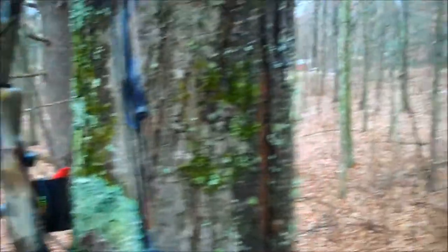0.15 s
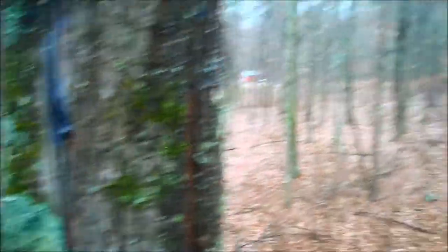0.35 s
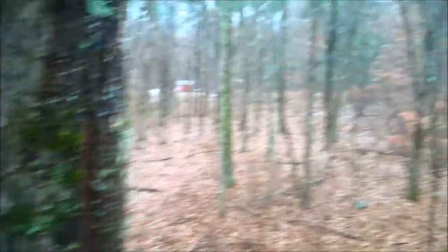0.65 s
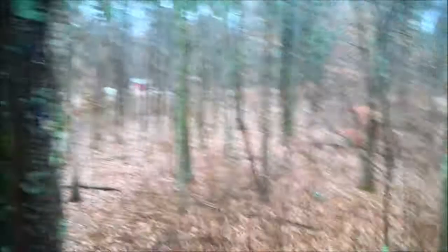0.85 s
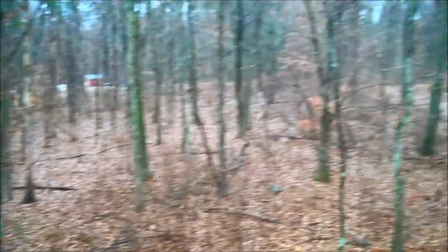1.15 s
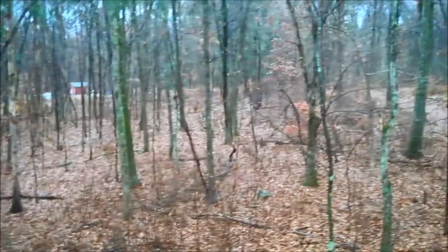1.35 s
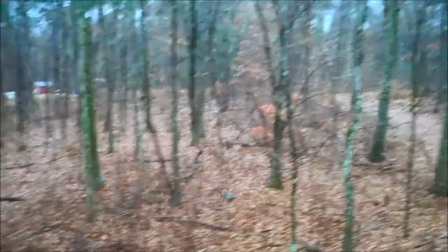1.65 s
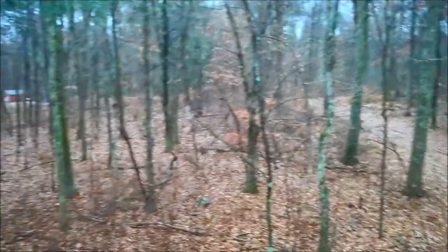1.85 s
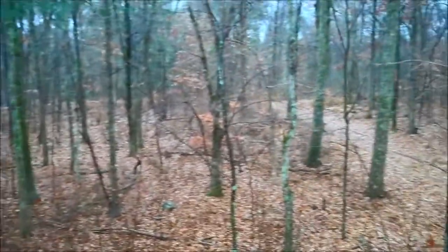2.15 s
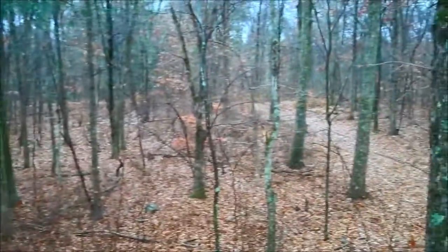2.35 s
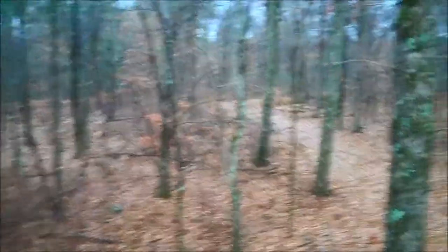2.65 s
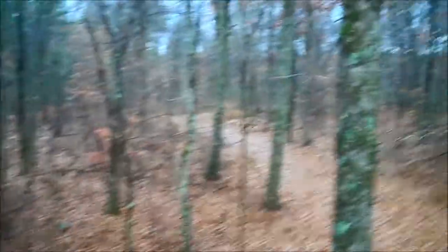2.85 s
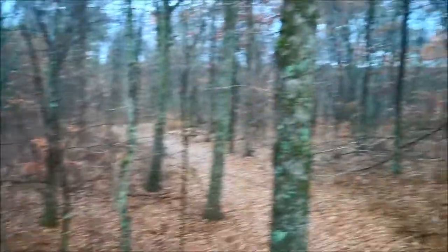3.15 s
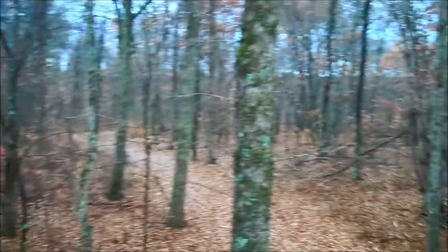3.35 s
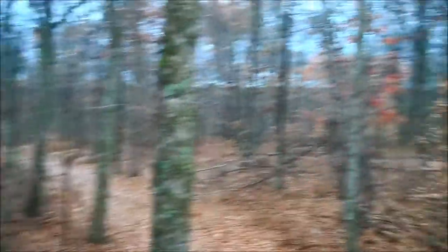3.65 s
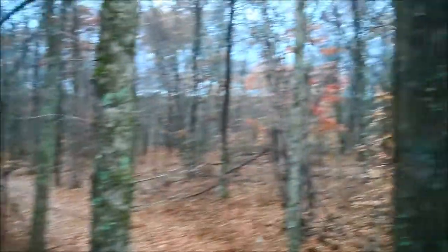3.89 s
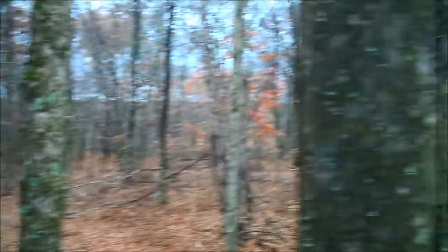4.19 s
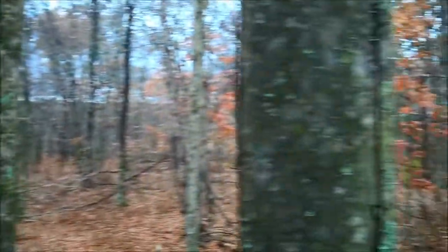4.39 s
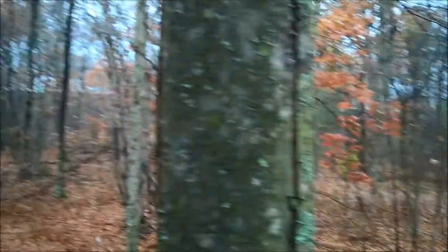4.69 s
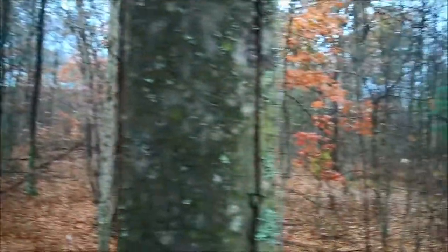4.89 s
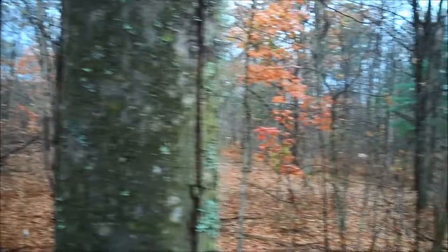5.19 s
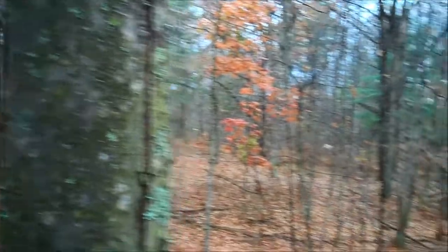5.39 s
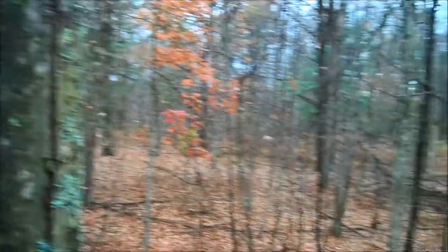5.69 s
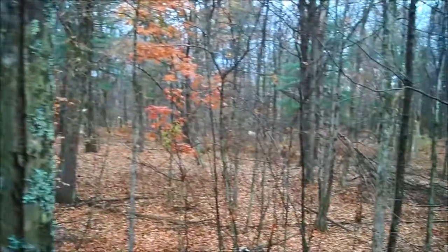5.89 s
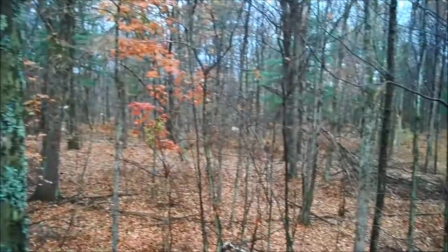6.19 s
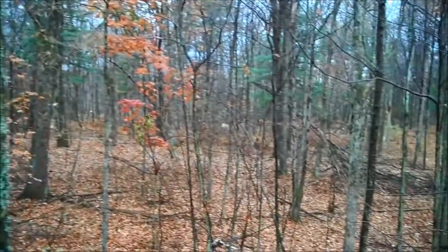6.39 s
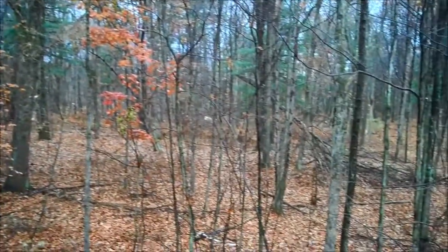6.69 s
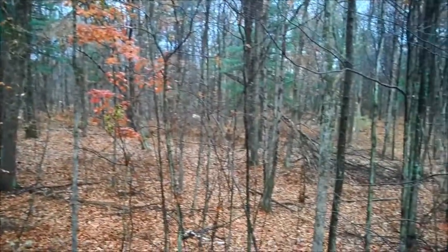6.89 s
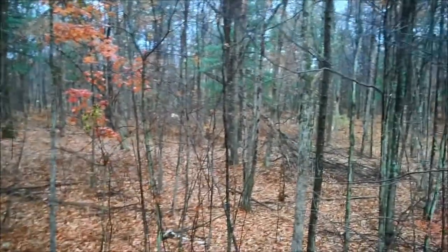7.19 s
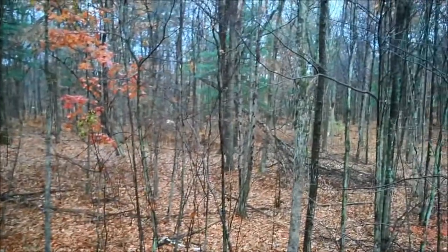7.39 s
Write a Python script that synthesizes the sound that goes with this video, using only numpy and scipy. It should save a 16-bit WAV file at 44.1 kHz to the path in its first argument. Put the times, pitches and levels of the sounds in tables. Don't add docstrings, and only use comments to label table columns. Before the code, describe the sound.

Steady light rain in a leafless wood, heard in stereo from a hand-held microphone. Throughout, countless distant drops merge into a soft broad hiss, with fine, dense patter on leaf litter. The hiss swells gently around 1 and 2 seconds, slightly at 3.3, and briefly at 7.15. Close drops stand out irregularly: crisp leaf clicks and a small spray around 0.65-1.2, faint low wind puffs from 1.3 to 1.9, mostly right, then a dull tap at 1.8. From 2.6 onward ticks thicken, with a sharp bark tick at 3.0 and leaf ticks and splashes around 3.6-4.6. At 4.83 a fat drop lands with a short, blunt pop beside the microphone; the brightest leaf snap follows at 5.03. More woody ticks, soft thuds and little sprays cluster near 5.4 and 5.9-6.1, continuing until 7.3. The rain, slightly brighter and stronger, runs on to the end at about 7.5.

```python
import sys
import numpy as np
from scipy import signal
from scipy.io import wavfile
from scipy.ndimage import uniform_filter1d

SR = 44100
rng = np.random.default_rng(int(sys.argv[2]) if len(sys.argv) > 2 else 0)


def persist_wave(psi):
    counts = np.round(np.clip(psi, -1, 1) * 32767).astype(np.int16)
    wavfile.write(sys.argv[1], SR, np.atleast_2d(counts).T)


def elevation(decibels):
    levels = np.asarray(decibels, float)
    return 10 ** (levels / 20)


N = 332514

LEFT_LAG, STEP, SHORT = 4, 32, 2048

# t/s, level/dB
RAIN_STRENGTH = [(0.0, -53.5), (0.55, -54), (0.97, -52), (1.57, -53.5), (2.18, -52), (2.33, -51.5),
                 (4.87, -49.5), (5.06, -48.5), (5.69, -50.5), (7.54, -48)]


def rms_one(x):
    return x / np.sqrt(np.mean(x ** 2) + 1e-20)


def peak_one(x):
    return x / (np.max(np.abs(x)) + 1e-20)


def in_time(rows, step=1):
    s, *columns = np.transpose(rows)
    times = np.arange(0, N + step - 1, step) / SR
    return [np.interp(times, s, column) for column in columns]


def at_hz(points, hz):
    table_hz, values = np.transpose(points)
    return np.interp(np.log(hz), np.log(table_hz), values)


def fine(slow):
    return np.interp(np.arange(N) / STEP, np.arange(len(slow)), slow)


def drift(rate_hz):
    r = np.exp(-2 * np.pi * rate_hz * STEP / SR)
    size = len(range(0, N + STEP - 1, STEP))
    wander = signal.lfilter([1], [1, -2 * r, r * r], rng.standard_normal(2 * size))
    return rms_one(wander[size:])


def resonance(x, hz, width_hz):
    r = np.exp(-np.pi * width_hz / SR)
    poles = [1, -2 * r * np.cos(2 * np.pi * hz / SR), r * r]
    return signal.lfilter([(1 - r * r) / 2, 0, (r * r - 1) / 2], poles, x)


def fade(t60):
    return elevation(-60 * np.arange(SHORT) / SR / max(t60, .002))


def add(out, s, sound, pan_db, lag):
    for side, shift, db in ((0, lag, pan_db / 2), (1, 0, -pan_db / 2)):
        at = round(s * SR) + shift
        out[side, at:at + len(sound[side])] += elevation(db) * sound[side][:N - at]


def dripping():
    # t/s, rise/dB, half width/s
    boughs = [
        (0.95, 3.3, 0.34),
        (2.0, 3.5, 0.41),
        (3.3, 1.5, .5),
        (7.15, 5.5, .15),
    ]
    s = np.arange(0, N + STEP - 1, STEP) / SR
    return sum(db * np.exp(-((s - at) / width) ** 2) for at, db, width in boughs)


def far_rain(patchy_db, shared):
    # f/Hz, level per Hz/dB
    hiss_spectrum = [(25, -11), (60, -3.5), (130, -0.5), (300, -1), (700, -1), (1500, -2), (3000, -2),
                     (5000, -6.5), (7000, -10), (9000, -14), (12000, -12), (15000, -11)]
    # f/Hz, left-right correlation/1
    likeness = [(60, 0.14), (130, 0.93), (290, 0.79), (640, 0.8), (1400, 0.85), (3070, 0.59), (6740, -0.1),
                (14800, -0.27)]
    rain_db, = in_time(RAIN_STRENGTH, step=STEP)
    body_db = -2.5 + dripping()
    treble_db = rain_db - rain_db.mean()
    out = np.zeros((2, N))
    edges = 18 * 2 ** (np.arange(25) * .41)
    together = drift(8.0)
    white = rng.standard_normal((2, 2, N + LEFT_LAG))
    for k, (low, high) in enumerate(zip(edges, edges[1:])):
        band = signal.butter(2, [low, high], "band", fs=SR, output="sos")
        mid, side = signal.sosfilt(band, white[k % 2])
        hz = np.sqrt(low * high)
        alike = np.clip(at_hz(likeness, hz) + 0.032, 0, 1)
        a = np.sqrt(1 + alike) * mid
        b = np.sqrt(1 - alike) * side
        treble = hz ** 2 / (hz ** 2 + 2500 ** 2)
        near = hz / (hz + 150)
        flicker_db = patchy_db * (shared * together + drift(15.0))
        swell_db = near * (1 - treble) * body_db + treble * (treble_db + 0.17 + flicker_db)
        gain = fine(elevation(at_hz(hiss_spectrum, hz) + swell_db))
        out[0] += gain * (a + b)[:N]
        out[1] += gain * (a - b)[LEFT_LAG:]
    pan_db = 1.04
    return elevation(-50.0) * elevation(pan_db / 2 * np.array([[1], [-1]])) * rms_one(out)


def patter(per_s, spread_db, level_db, count=10):
    sizes = elevation(spread_db * np.minimum(rng.exponential(1, N), 2.75)) * rng.choice([-1, 1], N)
    born = rng.random(N) < per_s * fine(elevation(4.0 * drift(5.0))) / SR
    dealt = rng.integers(0, count, N)
    out = np.zeros((2, N))
    for k, hz in enumerate(np.geomspace(600, 11000, count)):
        splash = rng.standard_normal((2, SHORT)) * fade(0.006 + 4.0 / hz)
        splash[:, 0] = 2.8
        splash[1] = splash[0] + hz / 5000 * splash[1]
        splash = peak_one(0.5 * splash + resonance(splash, hz, 0.45 * hz) * 2.8)
        patch = signal.oaconvolve([sizes * born * (dealt == k)], splash, axes=1)[:, :N]
        out[0] += np.roll(patch[0], LEFT_LAG * rng.choice([0, 1, 2]))
        out[1] += patch[1]
    rain_db, = in_time(RAIN_STRENGTH)
    return elevation(level_db + rain_db - rain_db.mean()) * out


def ticks(rows, dull_db, t60):
    out = np.zeros((2, N))
    dull = elevation(dull_db)
    for s, db, pan_db in rows:
        left, common, right = rng.standard_normal((3, SHORT))
        common[0] = 11.1
        burst = (0.61 * common + np.array([left, right])) * fade(t60)
        bright = peak_one(resonance(burst, 5600, 6000))
        low = peak_one(resonance(burst, 3300, 2600))
        tick = bright / (1 + dull) + dull * low
        add(out, s + 0.000802, elevation(db - 2.5) * tick, pan_db, LEFT_LAG)
    return out


def bark_ticks():
    # t/s, peak level/dB, left-right/dB
    rows = [(0.0727, -39, -6), (0.2204, -37.5, 4), (0.609, -51, -4), (1.7794, -44, 1), (1.8218, -33.5, .5),
            (2.139, -36.5, .5), (2.5666, -36, 7), (2.6554, -36, -.5), (3.014, -26, 1), (3.0609, -39, -1),
            (3.5603, -37, 4), (3.6097, -34.5, -4), (3.717, -37, 9), (3.928, -36, 4), (4.2243, -35, -5),
            (4.2567, -45, 2), (4.2632, -30, -1), (4.3181, -36.5, 1), (4.8967, -36, 2.5), (5.3163, -34, .5),
            (5.4365, -31.5, -3), (5.456, -31, -2), (5.5423, -38, 4), (6.0207, -34, -8),
            (6.0566, -24.5, -3.5), (6.1399, -31.5, -2), (6.2621, -35, 0), (6.7336, -31, 2),
            (7.1631, -32, 4), (7.2434, -38, 10)]
    return ticks(rows, dull_db=5.5, t60=0.0088)


def taps(rows):
    out = np.zeros((2, N))
    for s, db, hz, t60 in rows:
        push = 0.4 * rng.standard_normal(SHORT) * fade(t60)
        push[0] += 2.5
        push = signal.lfilter([1], [1, -.6], push)
        width_hz = np.log(1000) / np.pi / max(t60, .002)
        main = peak_one(resonance(push, hz, width_hz))
        upper = peak_one(resonance(push, 1.3 * hz, 2.0 * hz))
        body = main + 1.3 * upper
        add(out, s + 0.001577, elevation(db - 3.0) * np.array([body, body]), -0.6, LEFT_LAG)
    return out


def litter_taps():
    # t/s, peak level/dB, f/Hz, t60/s
    rows = [(0.608, -35, 2040, 0.011), (6.734, -36, 1600, .01), (5.026, -36, 940, 0.012),
            (1.562, -41, 1850, .01), (1.778, -26.5, 1260, 0.012), (2.138, -37, 1250, 0.0088),
            (5.689, -39, 1300, .012), (2.565, -39, 1490, 0.0067), (2.792, -33.5, 2500, 0.0067),
            (3.013, -40, 724, 0.0079), (6.008, -38, 900, 0.0063), (3.181, -36.5, 860, .021),
            (3.792, -40, 2160, .01), (4.095, -34.5, 706, 0.012), (4.358, -34, 1850, 0.0092),
            (4.597, -34.5, 444, 0.005), (2.939, -37, 900, .008), (5.025, -30.5, 2480, 0.0053),
            (5.435, -30, 745, .0055), (5.455, -46, 1650, .01), (5.632, -38, 1800, 0.012),
            (4.704, -40, 1210, .01), (5.833, -33, 1580, 0.0086), (5.938, -44, 1900, 0.011),
            (5.988, -37, 1720, .011), (6.02, -34, 447, 0.0086), (6.732, -33, 676, 0.017),
            (6.854, -42, 1440, .013), (7.104, -34, 1900, 0.0063), (7.241, -35.5, 659, 0.0093)]
    return taps(rows)


def faint_taps():
    when, size, pitch = rng.random((16, 3)).T
    low_hz, high_hz = 443, 2350
    hz = low_hz * (high_hz / low_hz) ** pitch
    db = -43 - 4 * (2 * size - 1)
    return taps([(w * (N - SHORT) / SR, d, f, 0.0059) for w, d, f in zip(when, db, hz)])


def leaf_ticks():
    # t/s, peak level/dB, left-right/dB
    rows = [(0.6524, -28, -6), (0.842, -29, -2), (0.8714, -35, 4), (0.9023, -31, 8), (1.1164, -25.5, 5.5),
            (1.2072, -29, 3), (1.5633, -29, 0), (1.7379, -34, .5), (2.7312, -32, 11), (2.8719, -32, 6),
            (3.1817, -28.5, -1), (3.5768, -27, -1), (3.7933, -28, -3), (4.0123, -28.5, 9),
            (4.1121, -25, -1), (4.36, -27.5, 5), (4.4982, -29, .5), (4.6304, -33, -1), (5.0265, -17.5, 1),
            (5.8341, -29, 6), (5.9094, -35, -3), (5.9384, -24, 1), (5.9893, -27.5, -2), (6.3599, -35, 1.5),
            (6.4038, -34, -6), (6.4597, -33, 1), (6.5984, -28.5, 11.5), (6.9601, -32, 4), (7.1057, -31, 17),
            (7.2684, -23.5, 2)]
    return ticks(rows, dull_db=-9.0, t60=.013)


def sprays():
    # t/s, peak level/dB, left-right/dB
    bursts = [(0.653, -22.5, -3), (0.904, -28, 10), (3.576, -27, -4), (3.6097, -29, 2), (3.647, -25, 4),
              (2.728, -31, 4), (3.017, -28, 2), (4.36, -34, 2.5), (4.8893, -33, 2), (5.345, -26, 3),
              (5.9386, -27, 0), (6.404, -31, -3), (6.46, -27, 2), (6.959, -27, 2), (7.106, -39, -1),
              (7.269, -31, 3.5)]
    out = np.zeros((2, N))
    for s, db, pan_db in bursts:
        noise = rng.standard_normal((3, SHORT))
        lumps = elevation(5.3 * rms_one(uniform_filter1d(noise[0], size=60)))
        scatter = rms_one(resonance(noise[1:] * lumps, 4400, 2900)) * fade(0.076)
        add(out, s + .0012, elevation(db - 22.0) * scatter, pan_db, 0)
    return out


def wind():
    # t/s, level/dB, left-right/dB
    gusts = [
        (1.285, -55, -12),
        (1.392, -60, 10),
        (1.474, -58, -10),
        (1.546, -56, -12),
        (1.7, -64, -6),
        (1.896, -66, 5.5),
    ]
    rise_s, fall_s = .025, 0.055
    s, envelope = np.arange(N) / SR, 0
    for at, db, pan_db in gusts:
        shape = np.exp(-((s - at) / np.where(s < at, rise_s, fall_s)) ** 2)
        envelope = envelope + shape * elevation(db + pan_db / 2 * np.array([[1], [-1]]))
    band = signal.butter(2, [16, 80], "band", fs=SR, output="sos")
    eddies = signal.sosfilt(band, rng.standard_normal((2, N)))
    return rms_one(eddies) * envelope


def fat_drop():
    # delay/s, strength/1
    blows = [
        (0, 0.6),
        (.00085, -2),
        (.0032, .3),
        (.0048, -0.27),
    ]
    # f/Hz, left level/dB, right level/dB, t60/s
    modes = [(365, -26, -26.5, 0.028), (607, -15, -14, 0.0056), (1260, -35, -24, 0.0061),
             (2300, -19, -17, 0.0041), (3000, -31, -30.5, 0.0065), (5080, -27, -28.5, 0.018),
             (6800, -38, -31, 0.011)]
    out, contact = np.zeros((2, N)), np.zeros(SHORT)
    for delay, strength in blows:
        contact[round(abs(delay) * SR)] += strength
    spray = rng.standard_normal((2, SHORT))
    sound = elevation(-28) * signal.lfilter([1, -.6], [1], spray) * fade(0.043)
    for hz, left_db, right_db, t60 in modes:
        struck = resonance(contact, hz, 2.07 * hz)
        mode = resonance(struck, hz, np.log(1000) / np.pi / t60)
        sound = sound + elevation(np.array([[left_db], [right_db]])) * peak_one(mode)
    add(out, 4.8343, sound, 0, 0)
    return out


def scene():
    rain = far_rain(patchy_db=1.47, shared=0.29) + patter(per_s=250, spread_db=6.0, level_db=-53.0)
    near = bark_ticks() + litter_taps() + faint_taps() + leaf_ticks() + sprays()
    return rain + near + wind() + fat_drop()


def top_cut(x):
    return signal.sosfilt(signal.butter(12, 14280, fs=SR, output="sos"), x)


def record(dry):
    # f/Hz, width/Hz
    cavities = [
        (7180, 1084),
        (5790, 1110),
    ]
    heard = np.zeros_like(dry)
    for side, (hz, width_hz) in enumerate(cavities):
        r = np.exp(-np.pi * width_hz / SR)
        poles = [1, -2 * r * np.cos(2 * np.pi * hz / SR), r * r]
        zeros = np.sum(poles) / 4 * np.array([1, 2, 1])
        heard[side] = signal.lfilter(zeros, poles, dry[side])
    heard += elevation(-63) * rng.standard_normal(dry.shape)
    band_limit = signal.ellip(10, .3, 45, 14280, fs=SR, output="sos")
    mix = signal.sosfilt(band_limit, heard)
    return top_cut(mix)


dry = scene()
out = record(dry)
persist_wave(out)
```